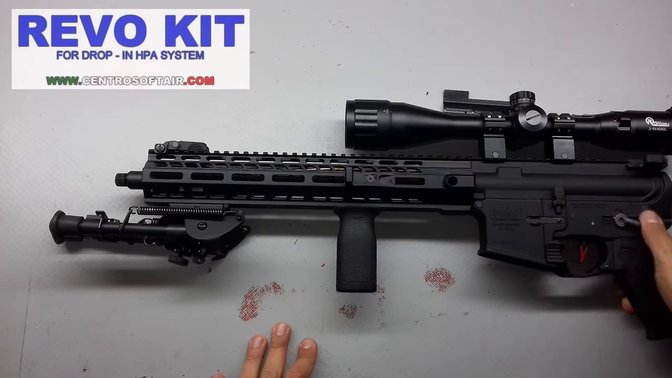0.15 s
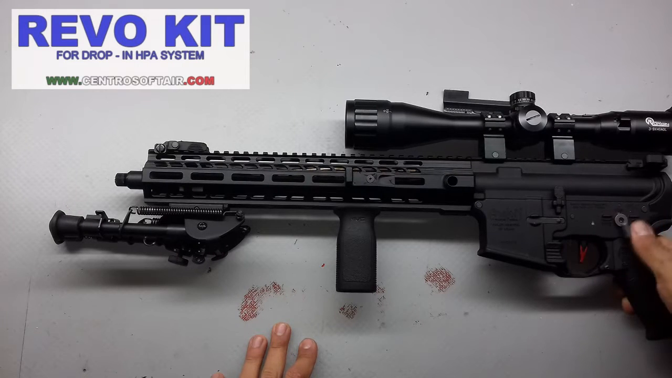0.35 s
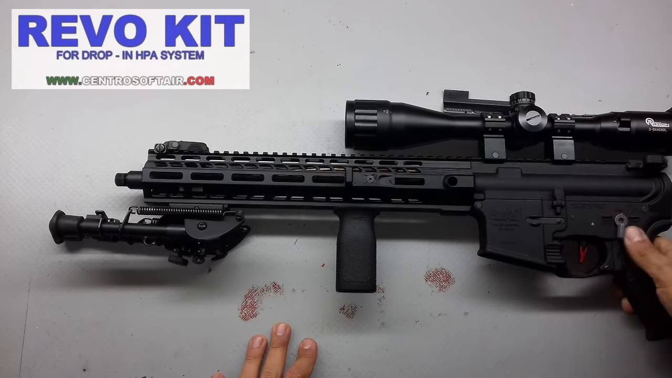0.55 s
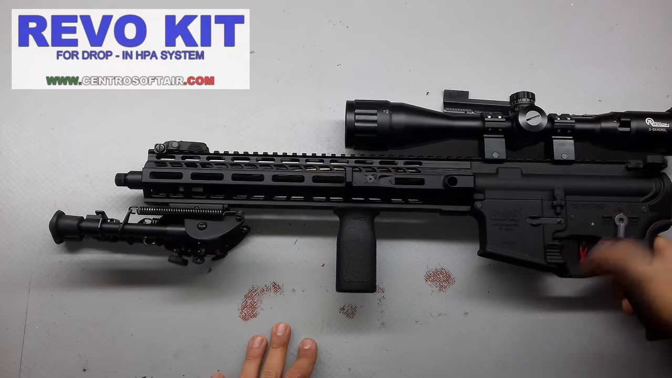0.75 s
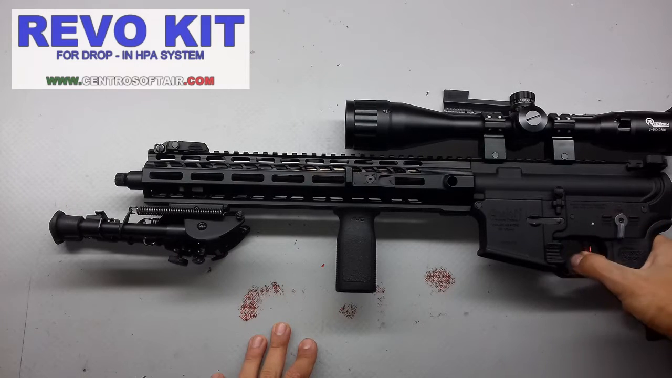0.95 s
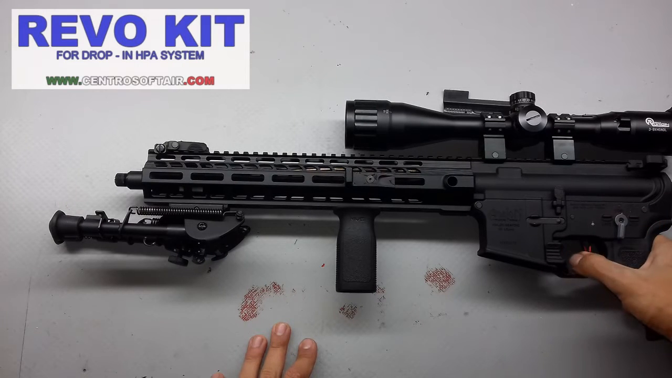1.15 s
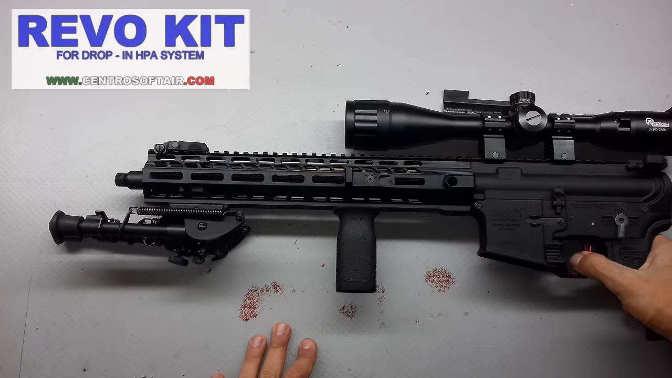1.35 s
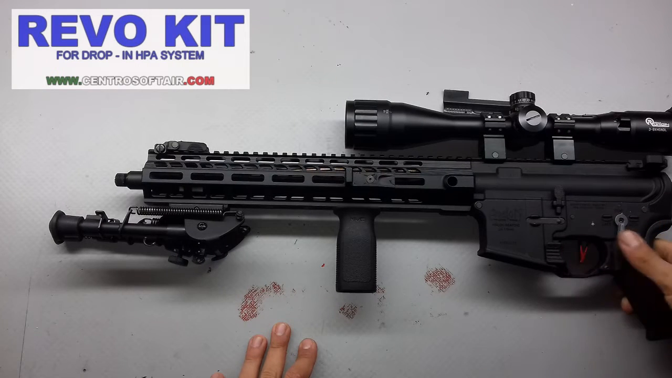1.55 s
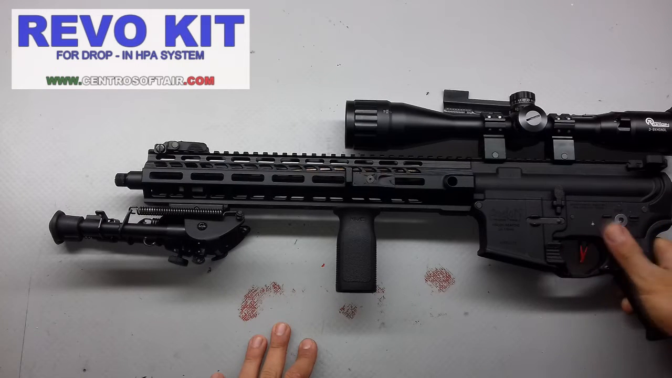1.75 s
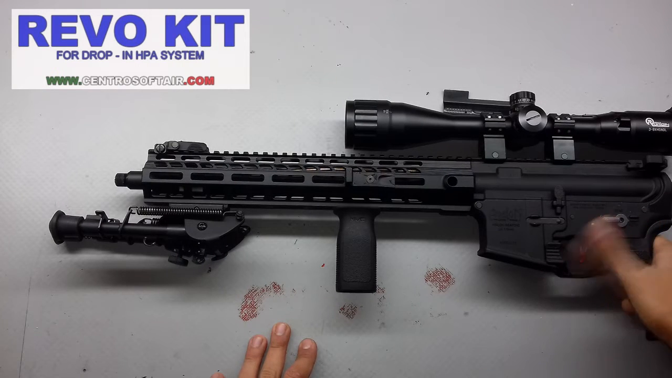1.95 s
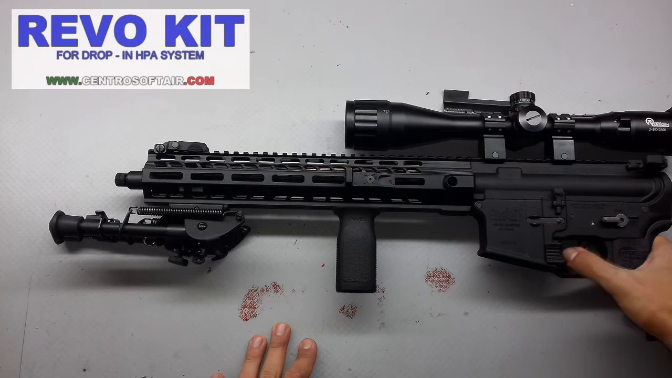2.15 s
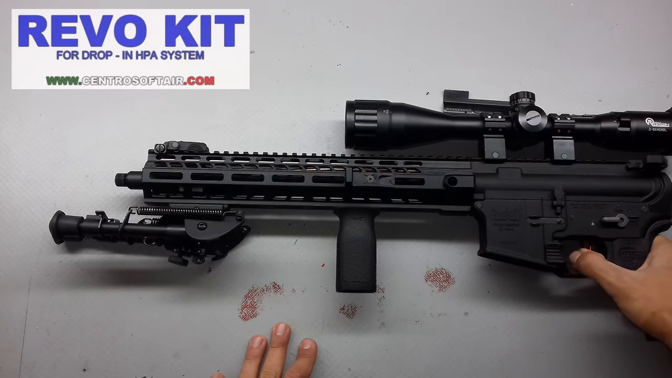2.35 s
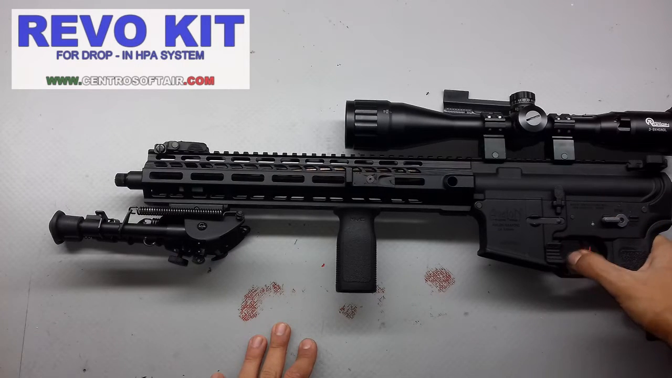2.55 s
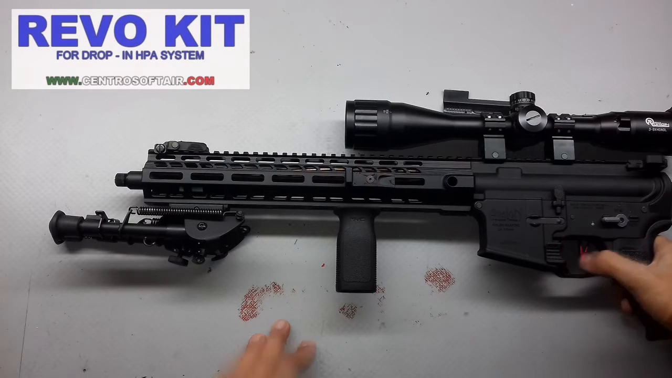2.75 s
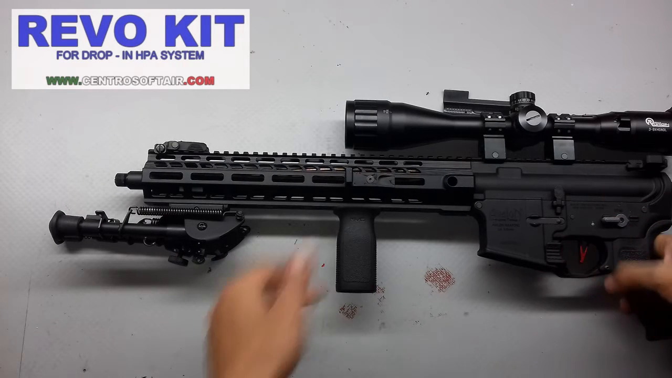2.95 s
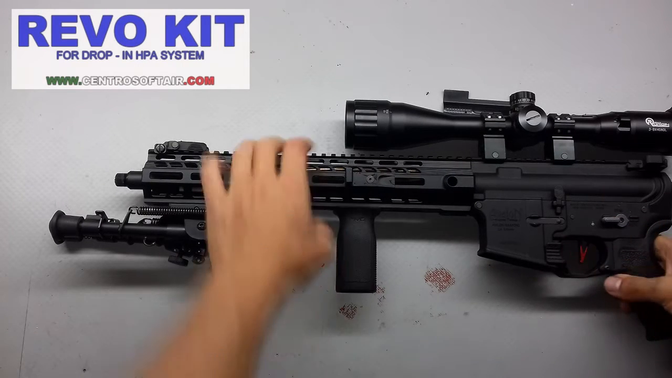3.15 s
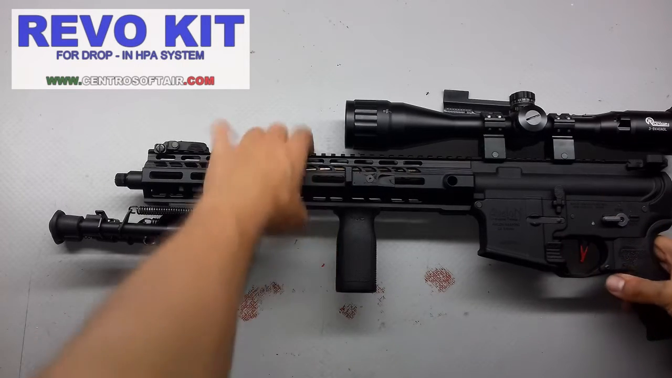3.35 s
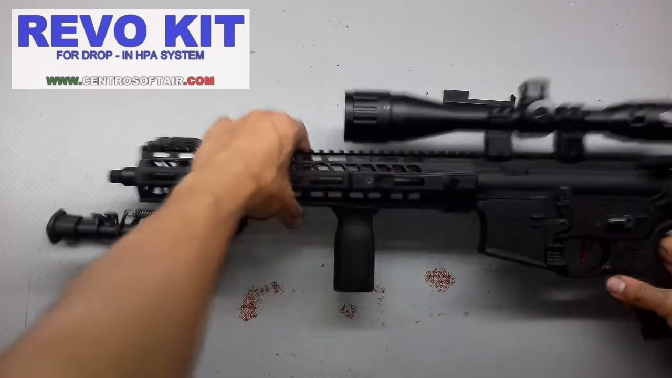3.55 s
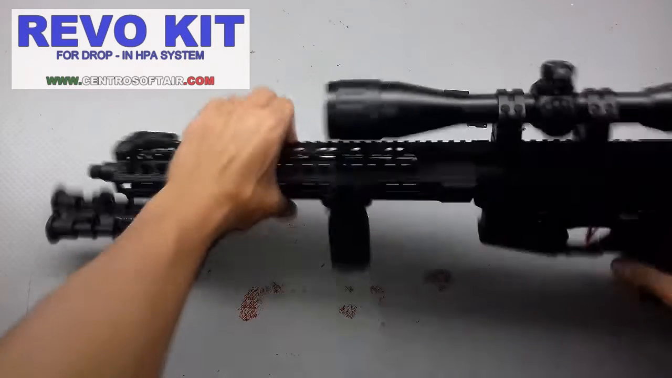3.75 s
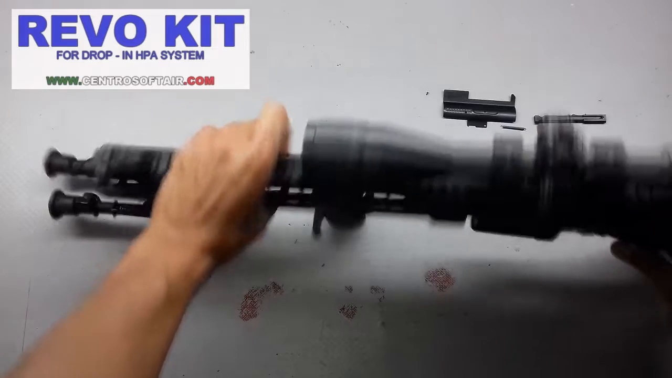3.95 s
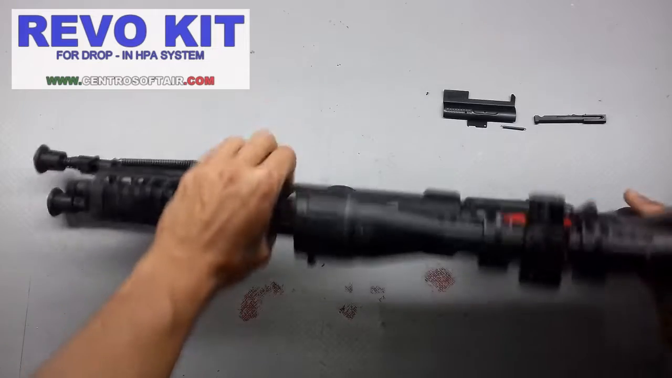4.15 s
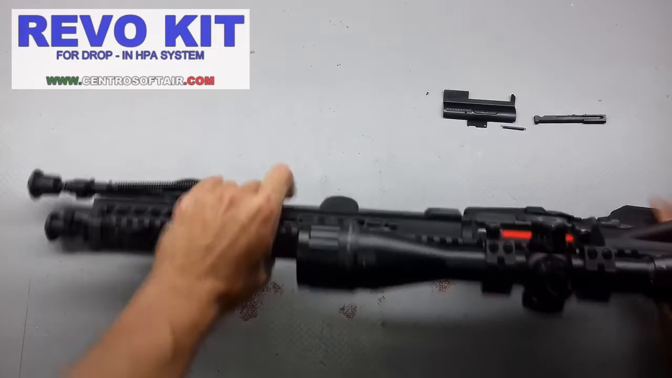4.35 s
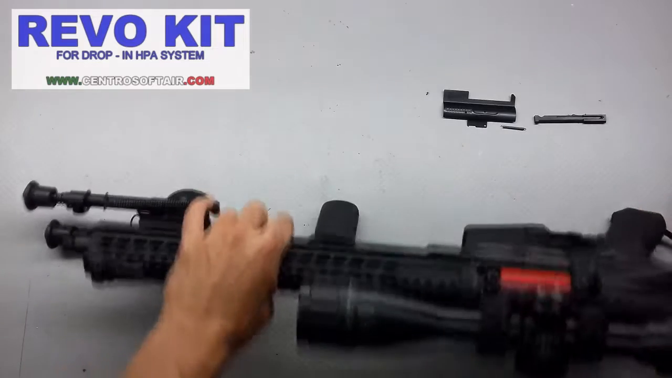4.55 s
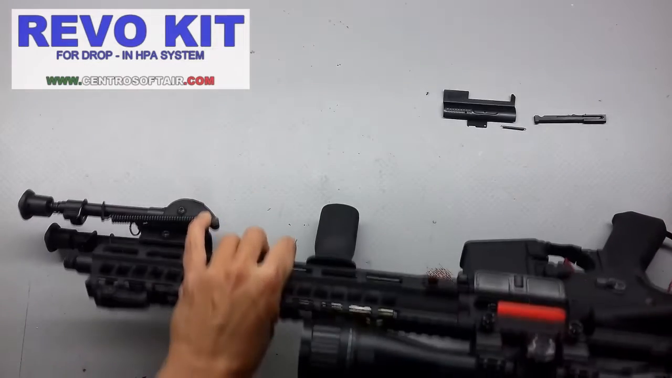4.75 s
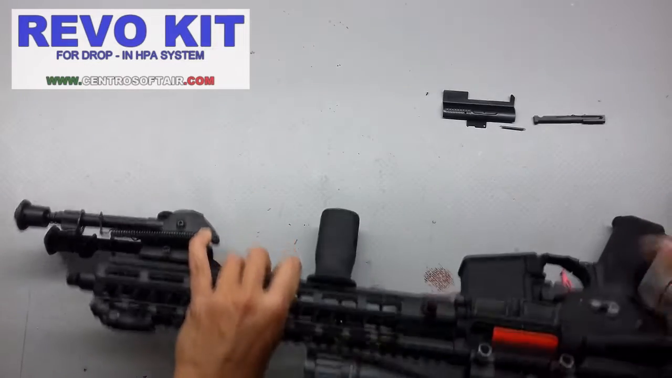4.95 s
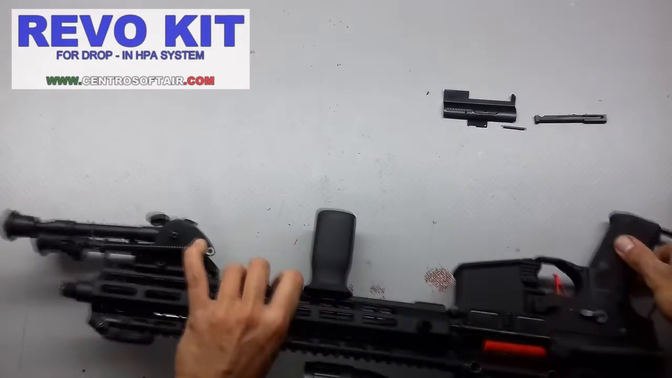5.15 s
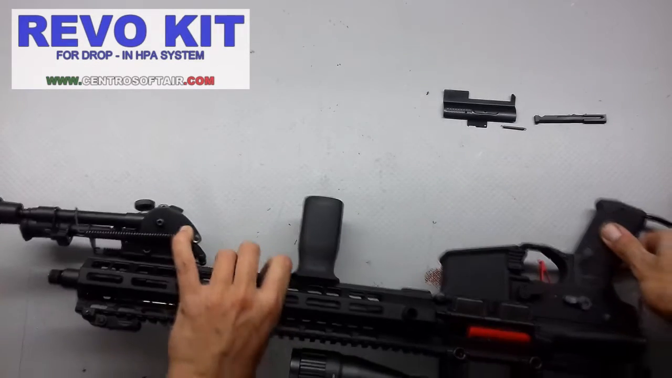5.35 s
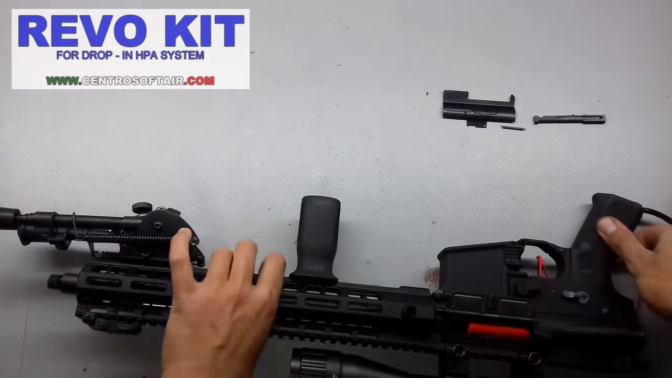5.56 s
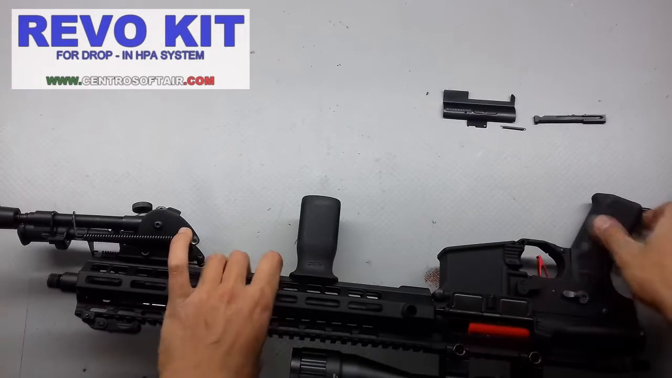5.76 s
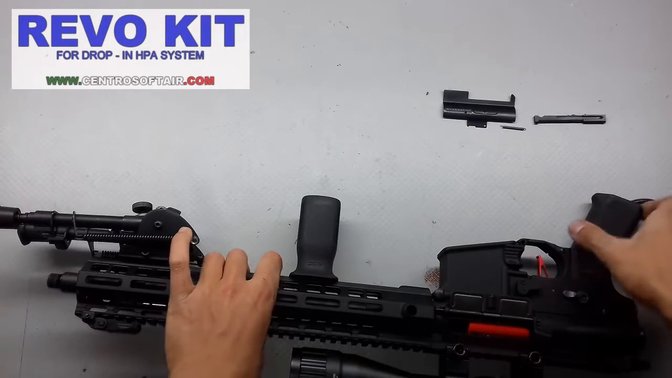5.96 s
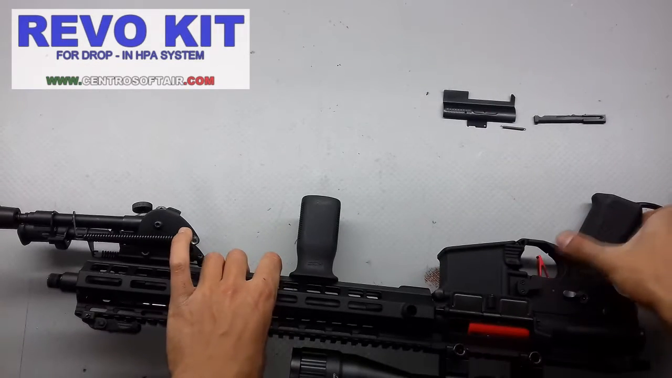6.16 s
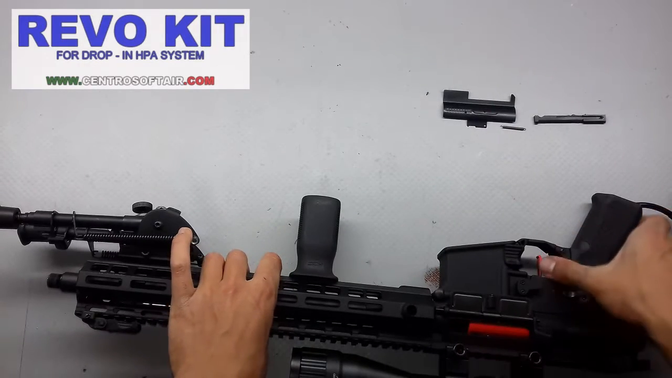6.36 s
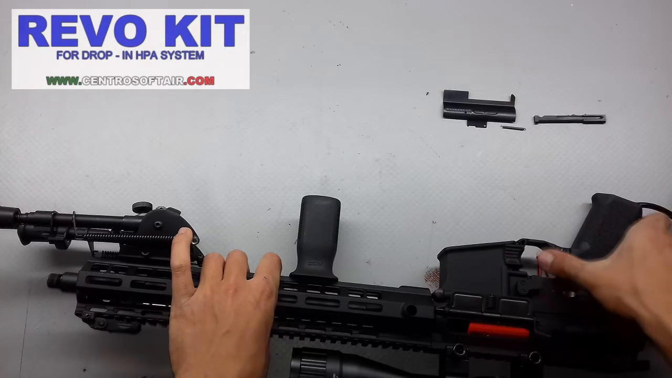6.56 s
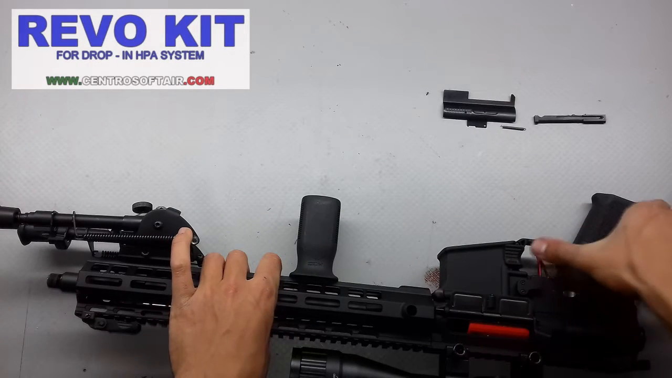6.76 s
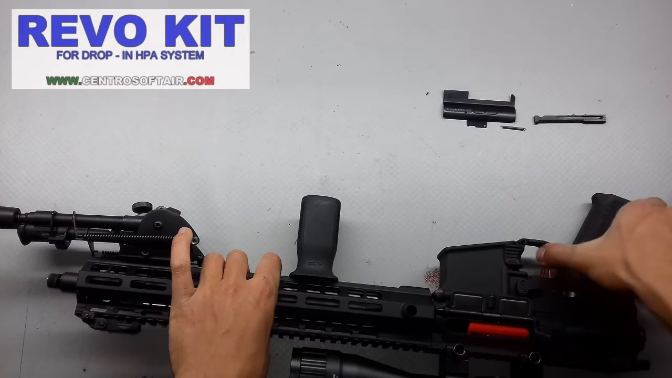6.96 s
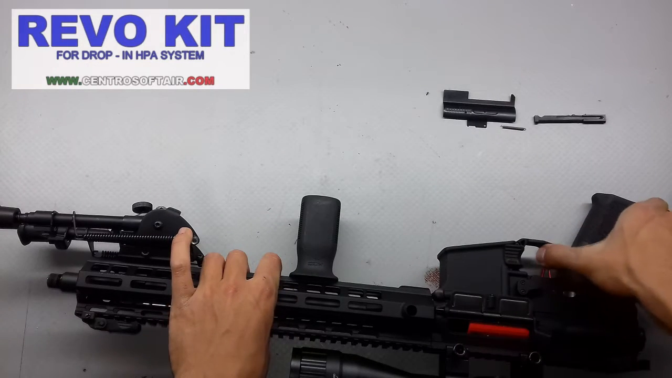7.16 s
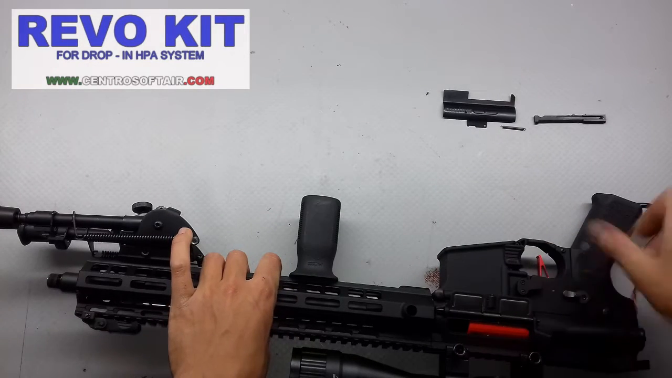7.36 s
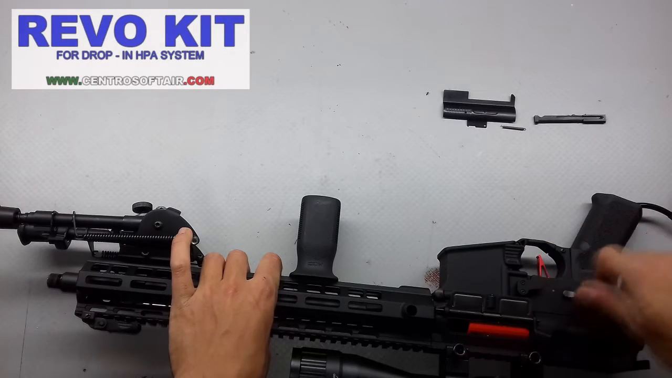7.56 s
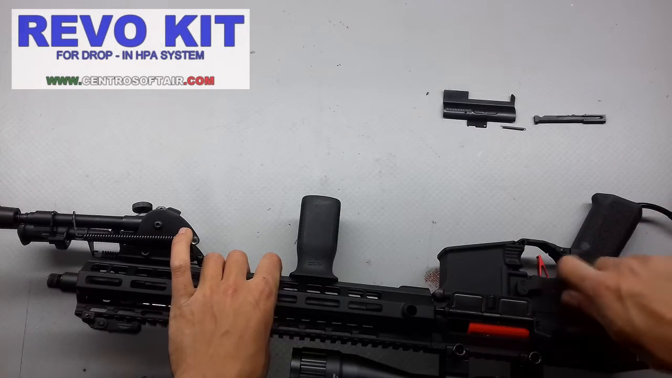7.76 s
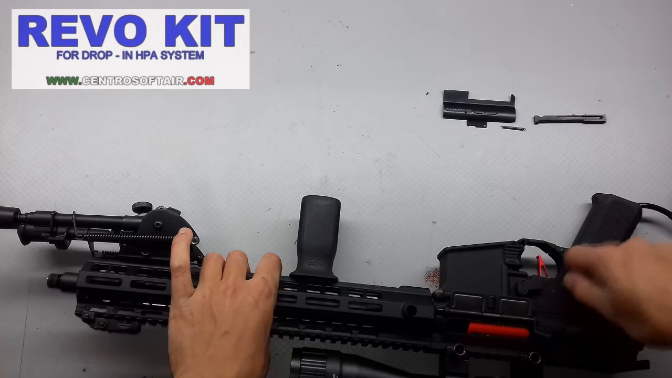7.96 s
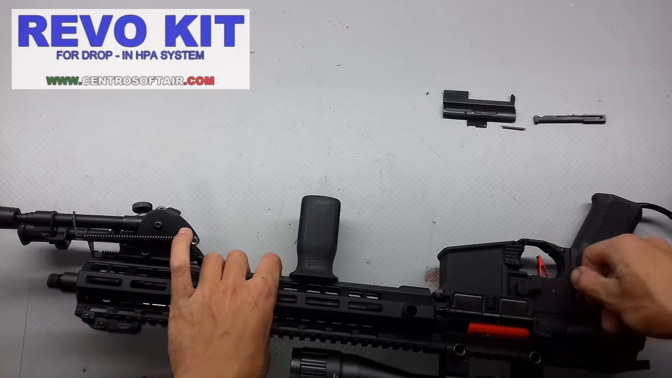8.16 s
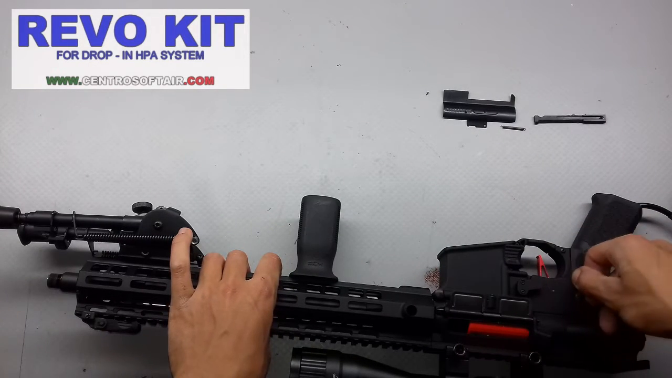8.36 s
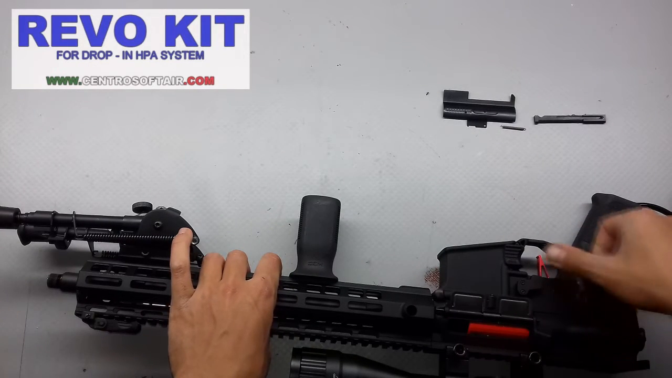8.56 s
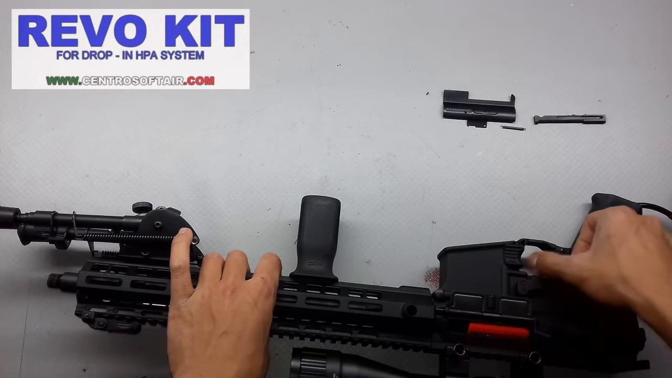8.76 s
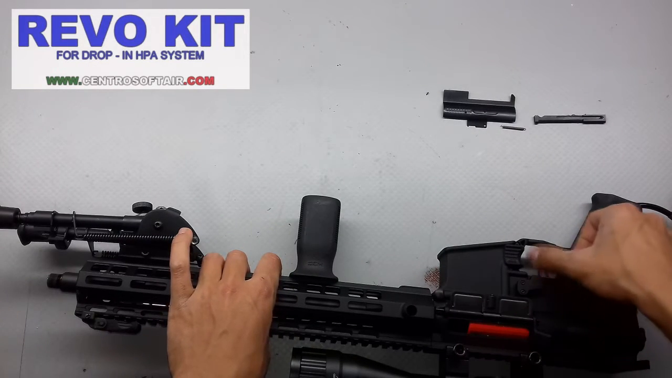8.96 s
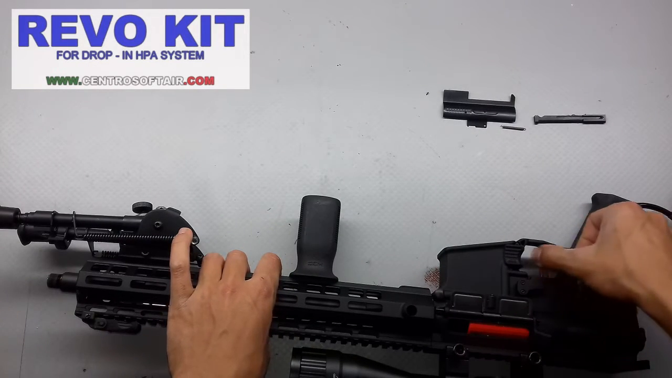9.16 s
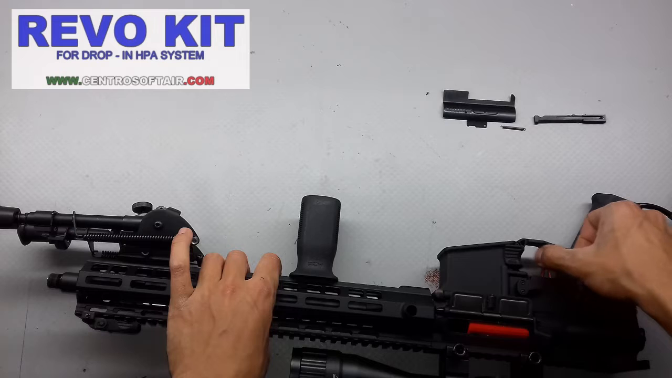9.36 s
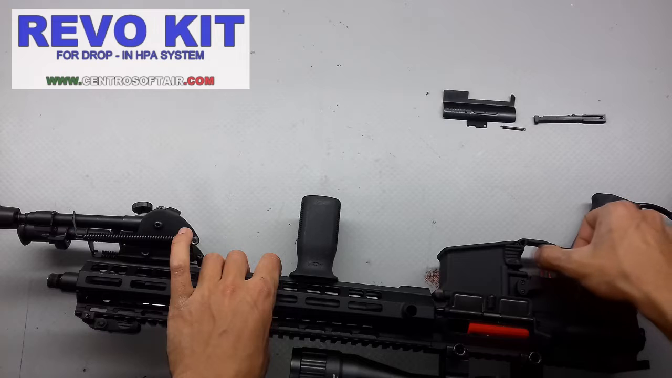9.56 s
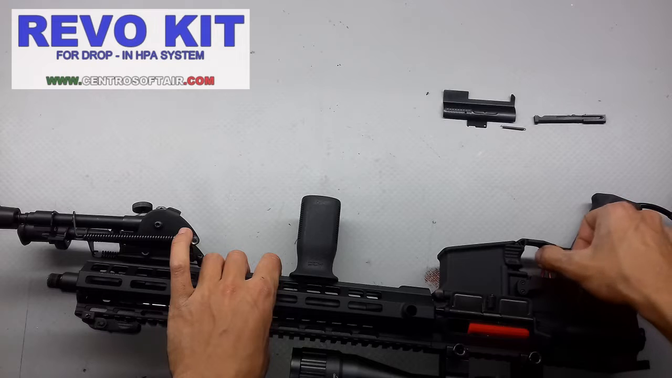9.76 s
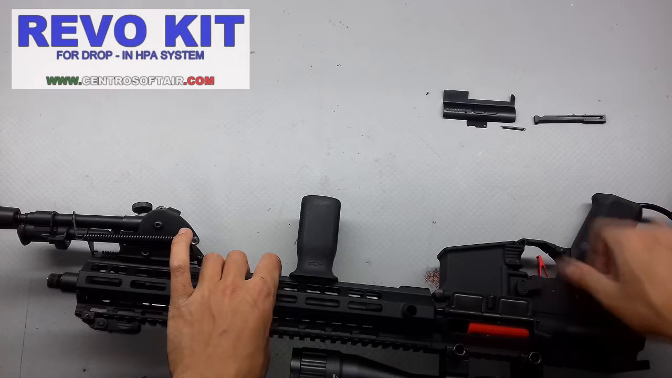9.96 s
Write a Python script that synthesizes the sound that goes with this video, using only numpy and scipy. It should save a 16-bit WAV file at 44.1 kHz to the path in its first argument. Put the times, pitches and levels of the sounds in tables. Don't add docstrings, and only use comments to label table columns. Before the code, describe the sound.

An air-powered toy rifle on a table fires dry single pops and fast six-shot bursts, with selector clicks and handling clunks in a small hard room.

```python
import sys
import numpy as np
from scipy import signal
from scipy.io import wavfile
from scipy.ndimage import uniform_filter1d

SR = 44100
rng = np.random.default_rng(int(sys.argv[2]) if len(sys.argv) > 2 else 0)


def magnitude_from_level(level_db):
    exponent = np.asarray(level_db, float) / 20
    return 10 ** exponent


def inscribe(sig):
    pcm = np.round(np.clip(np.atleast_2d(sig).T, -1, 1) * 32767)
    wavfile.write(sys.argv[1], SR, pcm.astype(np.int16))


N = 441000

# (frequency [Hz], t60 [s])
ROOM_DECAY = [(60, 0.49), (160, 0.18), (420, 0.32), (1100, 0.33), (2900, .32), (6000, 0.36), (10000, 0.26),
              (15000, 0.17)]
# (frequency [Hz], level [dB], t60 [s])
TABLE_MODES = [(56.7, -5.5, 0.54), (74.95, -4.5, .24), (124.89, -1.5, 0.19), (158.3, -2, .3),
               (174.13, -1.5, .2), (315, -5.5, 0.12), (350, -4.5, .15), (541, -7.5, 0.093)]
# (frequency [Hz], density [dB per Hz])
HUSH_SPECTRUM = [(32, -33), (55, -2.5), (136, -0.5), (905, -4), (1180, -6), (1290, -7), (1760, -7.5),
                 (3670, -14), (5000, -24.5), (8430, -21), (9950, -25), (13600, -19), (16000, -27.5)]
# (start [s], end [s], ring [Hz], rms level [dB])
SCRAPES = [(0.025, 0.103, 600, -63.5), (0.375, 0.412, 1100, -48.5), (0.409, 0.49, 340, -59),
           (0.43, 0.458, 2269, -40), (3.443, 3.471, 2220, -48.5), (3.45, 3.496, 1150, -48.5),
           (3.475, 3.509, 690, -52.5), (4.163, 4.263, 600, -55.5), (5.115, 5.143, 2010, -41),
           (5.27, 5.317, 3334, -53), (5.371, 5.525, 3350, -66.5), (5.583, 5.707, 3810, -66),
           (5.716, 5.792, 2200, -60.5), (5.86, 5.959, 3439, -61), (5.925, 5.985, 3440, -55),
           (5.932, 5.98, 1600, -50), (7.949, 7.968, 2800, -55), (8.013, 8.061, 2675, -65),
           (8.473, 8.494, 2799, -59)]
# (start [s], fastest [s], end [s], rubbing [dB], weight on the table [dB])
MOVES = [(0.052, 0.465, 0.7278, -59, -3), (1.55, 1.82, 2.389, -65.5, 2.7114), (2.7, 2.803, 4.1, -66, -5),
         (2.948, 3.351, 3.6208, -54, -3), (3.2, 3.75, 3.9477, -61, -7.5), (3.85, 4.214, 4.8528, -50.5, 3),
         (4.396, 4.713, 5.03, -62.5, -1), (5.05, 5.263, 5.6459, -47, 6), (5.197, 5.851, 6.67, -62, -1),
         (6.6, 6.9, 6.627, -71, 1), (7.62, 7.98, 8.4015, -68.5, 7), (8.299, 8.55, 8.46, -80, 5)]
# (frequency [Hz], density [dB per Hz])
RUB_SPECTRUM = [(88, -29.5), (150, -5), (209, -8.5), (333, -1), (565, -4.5), (1130, -8.5), (2470, -12),
                (2750, -9.5), (4070, -10.5), (5500, -35), (7150, -61), (12100, -120)]
# (time [s], table level [dB], knock [Hz], knock over table [dB])
BUMPS = [(0.07, -64.5, 413.4, 9.5), (0.339, -54, 598, -1), (0.435, -64, 350, -12),
         (1.859, -46.5, 641.6, -15.5), (2.969, -66, 471.3, 6.5), (3.223, -46, 500.7, -19),
         (3.964, -46, 490, 0.7347), (4.098, -38, 310, -9.5), (4.179, -20.5, 340.6, -13.5),
         (4.207, -39, 495, 1.5), (4.299, -34.5, 404, -16), (4.359, -43, 393.7, -6), (5.054, -49.5, 350, 16),
         (5.123, -42, 482, 13), (5.191, -21, 364.7, -10.5), (5.21, -51, 368, -6), (5.255, -27.5, 472, -3.5),
         (5.29, -30, 390, -26), (5.522, -56, 540, 2.1), (5.743, -48.5, 598, -20.5), (5.932, -61, 540, -1.5),
         (7.805, -64.5, 807.7, -7.5), (8.485, -53.5, 786, -7.5)]
# (frequency [Hz], density [dB per Hz])
CLICK_SPECTRUM = [(180, -57.5), (300, -31), (434, -28.5), (986, -19.5), (1650, -7), (1940, -8),
                  (2800, -3.5), (3810, -6.5), (4840, -26), (14000, -55.5)]
# (time [s], peak level [dB], ring [Hz])
SELECTOR_CLICKS = [(0.154, -42.5, 3206), (0.199, -43, 3600), (0.31, -61, 3600), (0.341, -31, 2790),
                   (0.351, -28, 3500), (0.377, -26.5, 2264), (0.435, -30.5, 2200), (0.474, -37.5, 2340),
                   (1.677, -45.5, 2360), (1.718, -40.5, 1620), (1.728, -40.5, 3640), (1.745, -33, 2280),
                   (1.78, -31, 3815), (1.803, -27, 2170), (1.818, -30, 2460), (1.844, -27, 2157),
                   (1.978, -43.5, 3626), (7.679, -51.5, 1030), (7.808, -14, 3520), (7.942, -38, 2600),
                   (8.162, -53, 2715), (8.487, -39.5, 2610)]
# (time [s], peak level [dB], ring [Hz])
LIFTING_CLICKS = [(3.224, -37.5, 896.9), (3.629, -47, 3169), (3.777, -50, 2990), (3.802, -38.5, 1954),
                  (3.874, -39, 1210), (3.963, -33, 1850), (3.985, -43.5, 1802), (4.099, -32, 1963),
                  (4.179, -34, 3251), (4.583, -40, 1102), (4.635, -37, 3360), (4.676, -37, 1805)]
# (time [s], peak level [dB], ring [Hz])
LANDING_CLICKS = [(5.055, -28.5, 2150), (5.124, -24.5, 925), (5.159, -26, 2068), (5.19, -36, 3010),
                  (5.321, -29, 3260), (5.344, -30.5, 1654), (5.524, -41, 3800), (5.568, -55.5, 3770),
                  (5.806, -49, 894), (5.935, -34.5, 2549), (6.73, -49, 1823)]
# (time [s], peak level [dB], ring [Hz])
SNAP_CLICKS = [
    (1.853, -13, 3650),
    (1.867, -29, 3830),
    (5.208, -26, 3426),
    (5.214, -17.5, 3301),
    (5.255, -16.5, 3330),
]
# (time [s], peak level [dB], ring [Hz])
TRIGGER_CLICKS = [
    (0.961, -49.5, 2800),
    (2.239, -53.5, 2500),
    (6.943, -46.5, 3000),
    (8.83, -46, 2800),
    (9.062, -43, 2500),
    (9.375, -57, 2500),
    (9.882, -32.5, 1700),
]
# (t60 [s], ring share [0-1], room level [dB])
CLICK_TOUCH = [
    (0.035, 0.3, 7.5),
    (0.035, 0.38, 8),
    (0.026, 0.37, 2),
    (.029, .52, -1.8),
    (.025, 0.1, 3),
]
# (time [s], pop level [dB], lean to the high receiver family [dB], crack re pop [dB])
SHOTS = [(0.978, -7, -3.5, -27), (1.189, -4.5, -2.5, -21), (1.349, -4.5, -3, -17), (2.25, -7.5, -5, -27.5),
         (2.317, -6.5, .7, -22), (2.387, -5, .7, -21.5), (2.455, -5, -2, -22), (2.526, -5, -.6, -17),
         (2.593, -4.5, -2.5, -17.5), (6.974, -7, -1.5, -27.5), (7.041, -7.5, 5.5, -29),
         (7.111, -5.5, 4, -21), (7.179, -5, 3.5, -21), (7.249, -4.5, 0.7256, -20.5),
         (7.316, -4.5, 0, -16.5), (8.853, -6.5, -3, -35), (9.081, -4.5, -1.5, -23.5),
         (9.505, -6, -2, -26.5), (9.668, -4, -1.5, -22)]
# (crest [s], frequency [Hz], half width [s], level [dB])
SHOT_PULSES = [
    (.0016, 440, .0015, 0),
    (.0078, 400, .0014, -7),
    (.009, 130, .008, -17),
    (.0271, 620, .0021, -7),
    (.0265, 330, .0028, -7.5),
    (.0335, 500, .002, -12),
    (.051, 620, .002, -13),
]
# (frequency [Hz], crest [s], half width [s], level [dB])
RECEIVER_RINGS = [
    [(1150, .0140, 0.0029, 2.5), (940.77, .028, 0.0024, -0.5), (1100, 0.062, .004, -11.5)],
    [(1648, .016, 0.003, 1), (1591.8, .031, 0.0031, -4.5), (1600, .052, 0.0021, -10)],
]
# (frequency [Hz], density [dB per Hz])
JET_SPECTRUM = [(400, -30.5), (800, -10.5), (1000, -6.5), (1400, -9), (2200, -8.5), (3000, -6.5),
                (3700, -5), (4150, -9), (4700, -17.5), (5500, -22), (9000, -26.5), (16000, -34.5)]
# (frequency [Hz], density [dB per Hz])
CRACK_SPECTRUM = [(1500, -29), (4000, -5), (6500, 3.5), (9500, -2.5), (10200, -12), (12000, -6),
                  (15000, -5.5), (17000, -29.5)]
# (time [s], peak level [dB])
SPARKS = [
    (1.728, -56.5),
    (1.8535, -46.5),
    (5.1223, -67.5),
    (5.213, -41),
    (5.252, -41.5),
    (5.9349, -61),
    (7.8088, -53),
]
# (start [s], end [s], frequency [Hz], rms level [dB])
RAIL_SQUEAK = (4.26, 4.43, 2830, -62)


def evened(x):
    return x / np.sqrt(np.mean(x ** 2) + 1e-20)


def read(points, hz):
    f, value = np.transpose(points)
    return np.interp(np.log(hz + 1), np.log(f + 1), value)


def add(mix, s, sound):
    part = mix[round(s * SR):][:len(sound)]
    part += sound[:len(part)]


def coloured(x, spectrum):
    half = np.log(magnitude_from_level(read(spectrum, np.fft.rfftfreq(4096, 1 / SR))))
    log_spectrum = np.conj(signal.hilbert(np.r_[half, half[-2:0:-1]]))
    taps = np.fft.ifft(np.exp(log_spectrum)).real[:2048]
    return signal.oaconvolve(x, taps / np.linalg.norm(taps))[:len(x)]


def ring(hz, t60, rise):
    t = np.arange(SR // 2) / SR
    return np.sin(2 * np.pi * hz * t) * magnitude_from_level(-60 * t / t60) * (1 - np.exp(-t / rise))


def pulse(crest, hz, width):
    t = np.arange(3000) / SR - crest
    return np.cos(2 * np.pi * hz * t) * np.exp(-(t / width) ** 2)


def table(force):
    body = sum(magnitude_from_level(db) * ring(hz, t60, 0.0029) for hz, db, t60 in TABLE_MODES)
    return signal.oaconvolve(force, body / abs(body).max())[:N]


def room(x):
    taps = np.zeros(SR)
    at = np.arange(300, SR - 20, 20)
    taps[at + rng.integers(0, 20, len(at))] = rng.choice([-1., 1.], len(at))
    hz, t, bands = signal.stft(taps, SR, nperseg=256)
    decay = magnitude_from_level(-60 * t / read(ROOM_DECAY, hz)[:, None])
    tail = signal.istft(bands * decay, SR, nperseg=256)[1]
    return signal.fftconvolve(x, tail / np.linalg.norm(tail))[:N]


def hush():
    return magnitude_from_level(-68) * evened(coloured(rng.standard_normal(N), HUSH_SPECTRUM))


def scrapes():
    out = np.zeros(N)
    for start, end, hz, db in SCRAPES:
        slips = rng.standard_normal(round((end - start) * SR))
        part = ring(hz, 0.0058 * np.sqrt(2200 / hz), .0001)[:800]
        tone = evened(signal.oaconvolve(slips, part)[:len(slips)])
        grit = .5 * evened(coloured(slips, CLICK_SPECTRUM))
        add(out, start, magnitude_from_level(db - 0.5) * np.hanning(len(slips)) * (tone + grit))
    return out


def rubbing():
    rub, weight = np.zeros((2, N))
    slips = rng.standard_normal(N) * magnitude_from_level(2.0 * rng.exponential(1, N))
    drift = uniform_filter1d(uniform_filter1d(rng.standard_normal(N), 500), 500)
    lumps = magnitude_from_level(1.1 * evened(drift))
    hiss = evened(coloured(slips, RUB_SPECTRUM) * lumps)
    rumble = evened(table(rng.standard_normal(N) * lumps))
    edge_db = -23.5
    for start, fastest, end, db, weight_db in MOVES:
        t = np.arange(start, end, 1 / SR)
        speed_db = np.interp(t, [start, fastest, end], [edge_db, 0, edge_db])
        speed = magnitude_from_level(db + speed_db) * signal.windows.tukey(len(t), .1)
        add(rub, start, speed ** 2)
        add(weight, start, (magnitude_from_level(weight_db) * speed) ** 2)
    return magnitude_from_level(1.5) * np.sqrt(rub) * hiss + magnitude_from_level(-8.5) * np.sqrt(weight) * rumble


def bumps():
    force, knocks = np.zeros((2, N))
    push = np.hanning(round(0.0061 * SR))
    for s, db, hz, knock_db in BUMPS:
        add(force, s, magnitude_from_level(db) * push / push.sum())
        knock = ring(hz, 0.0284, 0.0014167) + .5 * ring(hz * 1.63, 0.02457, 0.0016)
        add(knocks, s, magnitude_from_level(db + knock_db + 9.0) * knock)
    return table(force) + knocks + magnitude_from_level(-6.5) * room(knocks)


def clicks():
    cracks, rings, blows = np.zeros((3, N))
    t = np.arange(4000) / SR
    actions = (SELECTOR_CLICKS, LIFTING_CLICKS, LANDING_CLICKS, SNAP_CLICKS, TRIGGER_CLICKS)
    for rows, (t60, share, wet_db) in zip(actions, CLICK_TOUCH):
        for s, db, hz in rows:
            noise = rng.standard_normal(len(t)) * magnitude_from_level(-60 * t / t60) * (1 - np.exp(-t / 0.00053))
            part = ring(hz, 0.0065, .0002)[:1000]
            tone = signal.oaconvolve(noise, part / np.linalg.norm(part))
            add(cracks, s, magnitude_from_level(db - 7) * (1 - share) * noise)
            add(rings, s, magnitude_from_level(db - 0.5) * share * tone)
            add(blows, s, magnitude_from_level(db + wet_db) * rng.choice([-1., 1.], 1))
    near = coloured(cracks, CLICK_SPECTRUM) + rings
    return near + magnitude_from_level(-10) * room(rings) + room(coloured(blows, CLICK_SPECTRUM))


def shots():
    pops, cracks, jets, rings, recoil, fronts = np.zeros((6, N))
    t = np.arange(3000) / SR
    pop = sum(magnitude_from_level(db) * pulse(crest, hz, width) for crest, hz, width, db in SHOT_PULSES)
    pop = pop * (1 - np.exp(-t / 0.00011))
    opening = 1 - np.exp(-(t / 0.0022) ** 2)
    slam = np.exp(-((t - .028) / 0.0016) ** 2)
    valve = opening * np.exp(-(t / 0.013) ** 2) + 0.32 * slam
    jet_db, ring_db = -7.5, -16
    for s, db, lean_db, crack_db in SHOTS:
        add(pops, s, magnitude_from_level(db - 1.5) * pop)
        crack = opening * np.exp(-t / 0.013) * rng.standard_normal(len(t))
        add(cracks, s, magnitude_from_level(db + crack_db - 1.0) * crack)
        add(jets, s, magnitude_from_level(db + jet_db - 8.5) * evened(valve * rng.standard_normal(len(t))))
        add(fronts, s, magnitude_from_level(db + jet_db + 22) * np.ones(1))
        add(recoil, s + 0.0034, magnitude_from_level(db - 24.5) * np.r_[1, np.zeros(130), -1])
        for family, family_db in zip(RECEIVER_RINGS, (ring_db - lean_db, ring_db + lean_db)):
            for hz, crest, width, mode_db in family:
                late = crest + .0005 * rng.standard_normal()
                mode = pulse(late, hz * rng.uniform(0.94, 1.03), width)
                add(rings, s, magnitude_from_level(db + family_db + mode_db + 3.5) * mode)
    jets, cracks = coloured(jets, JET_SPECTRUM), coloured(cracks, CRACK_SPECTRUM)
    near = pops + 0.83 * jets + cracks + rings + table(recoil)
    to_walls = magnitude_from_level(-7) * pops + magnitude_from_level(-9) * jets + coloured(fronts, JET_SPECTRUM)
    to_walls = to_walls + magnitude_from_level(-6.0) * cracks + magnitude_from_level(-8) * rings
    small = signal.butter(3, 105, "high", fs=SR, output="sos")
    return signal.sosfilt(small, near + room(to_walls))


def sparks():
    out, t = np.zeros(N), np.arange(1000) / SR
    for s, db in SPARKS:
        add(out, s, magnitude_from_level(db - 7) * np.exp(-t / .003) * rng.standard_normal(len(t)))
    out = coloured(out, CRACK_SPECTRUM)
    return out + magnitude_from_level(-3.0) * room(out)


def squeak():
    start, end, hz, db = RAIL_SQUEAK
    slips = rng.standard_normal(round((end - start) * SR))
    drag = slips * np.hanning(len(slips)) ** .5
    whistle = signal.oaconvolve(drag, ring(hz, 0.01843, 0.00088)[:2000])
    out = np.zeros(N)
    add(out, start, magnitude_from_level(db) * evened(whistle))
    return out


def scene():
    drags = scrapes() + squeak()
    handling = drags + magnitude_from_level(-9.5) * room(drags) + rubbing() + bumps() + clicks() + sparks()
    return (hush() + handling + shots())[None]


def top_cut(x):
    return signal.sosfilt(signal.butter(12, 16660, fs=SR, output="sos"), x)


def record(dry):
    overloaded = 1.2605 * np.tanh(dry / 1.3548)
    thinned = signal.sosfilt(signal.butter(2, 60, "high", fs=SR, output="sos"), overloaded)
    notched = thinned - 0.46 * signal.lfilter(*signal.iirpeak(10100, 14, fs=SR), thinned)
    top = signal.firwin(255, 16150, window=("kaiser", 8), fs=SR)
    mix = signal.oaconvolve(notched, top[None], "same") - .0005
    return top_cut(mix)


dry = scene()
out = record(dry)
inscribe(out)
```